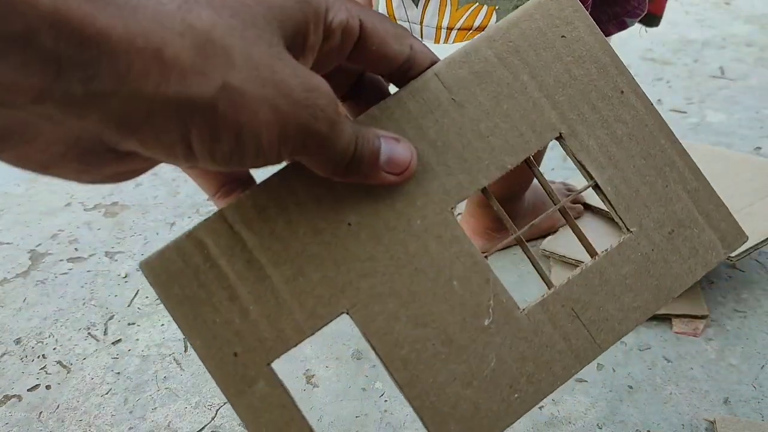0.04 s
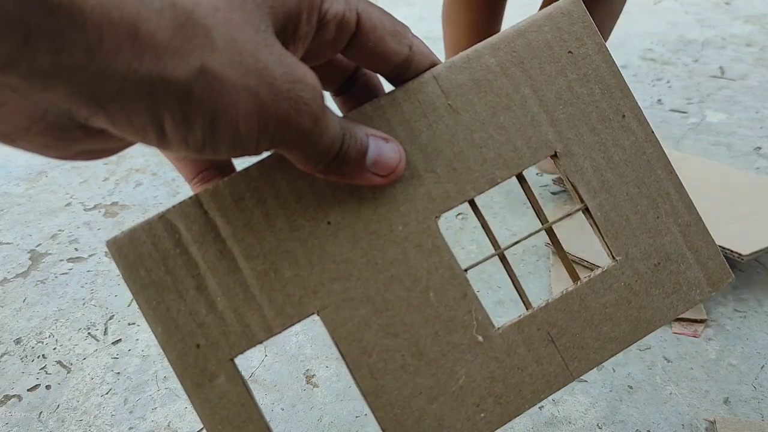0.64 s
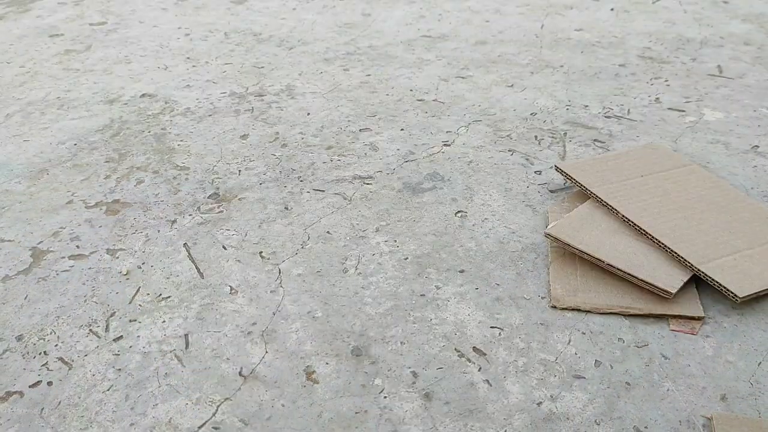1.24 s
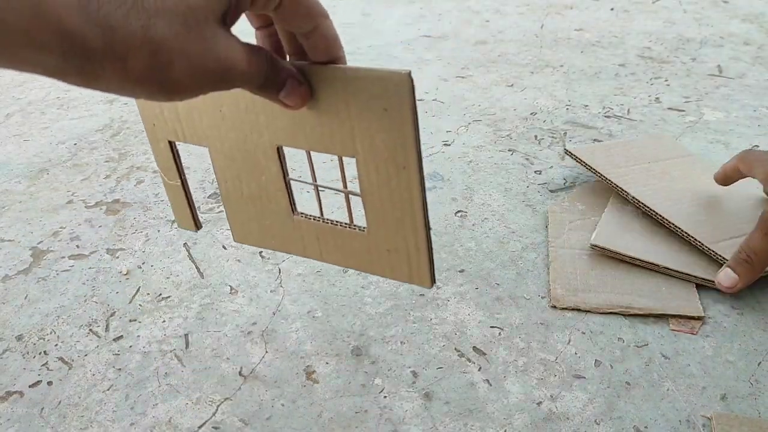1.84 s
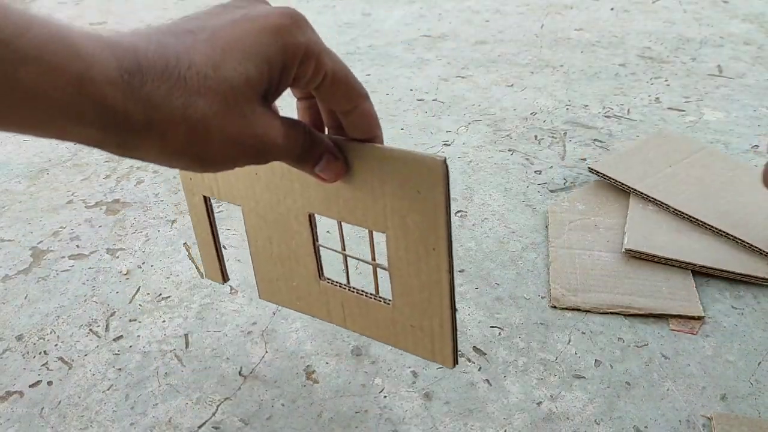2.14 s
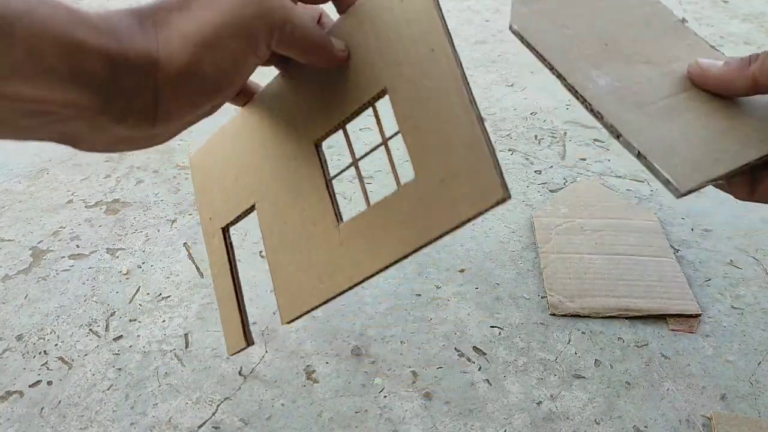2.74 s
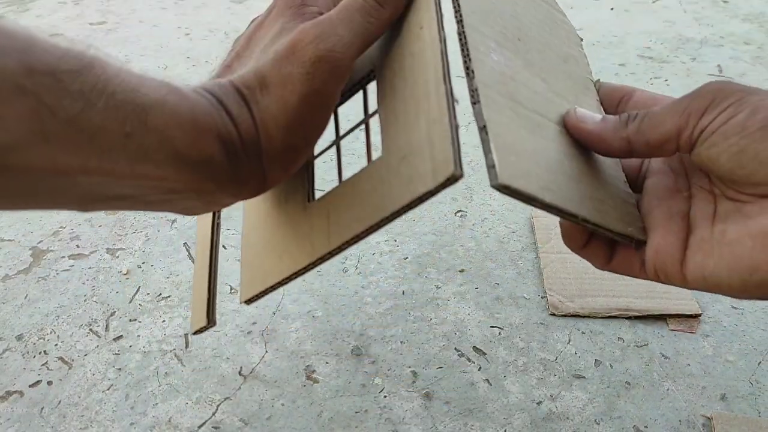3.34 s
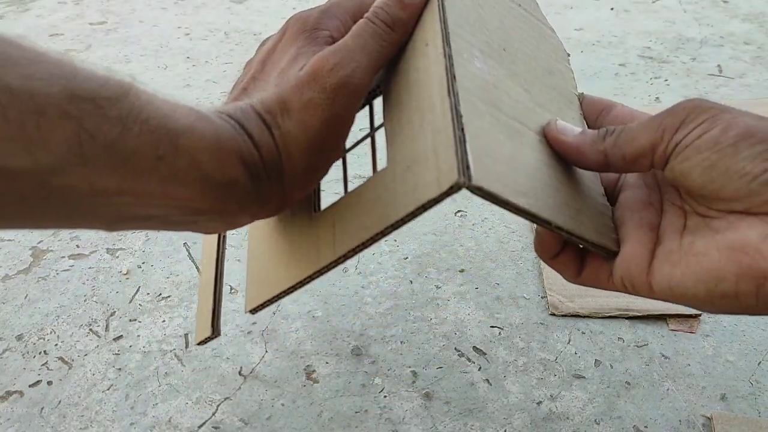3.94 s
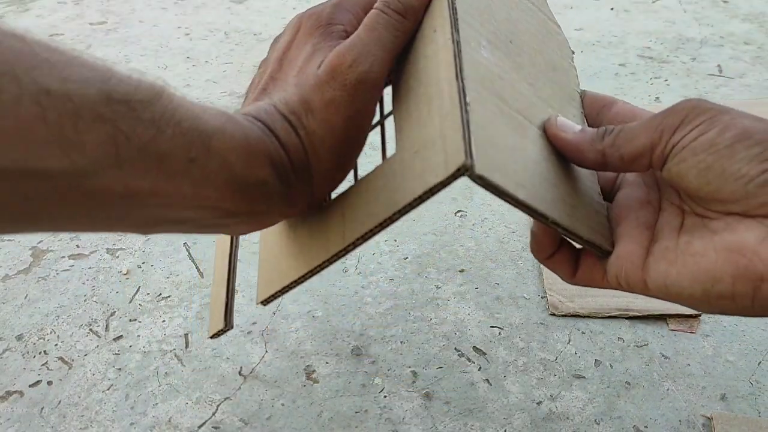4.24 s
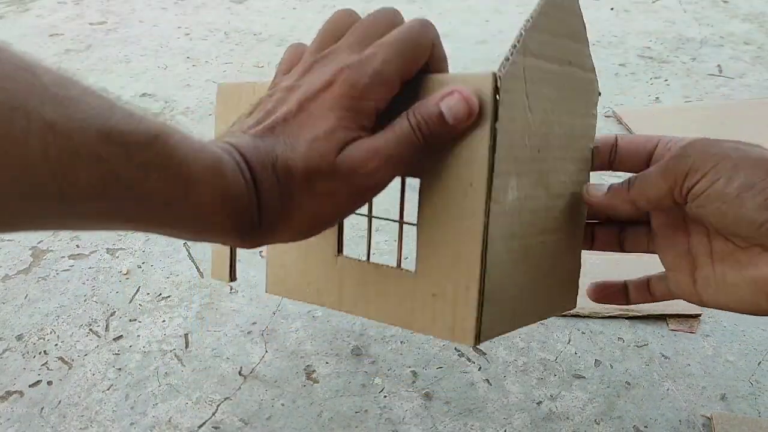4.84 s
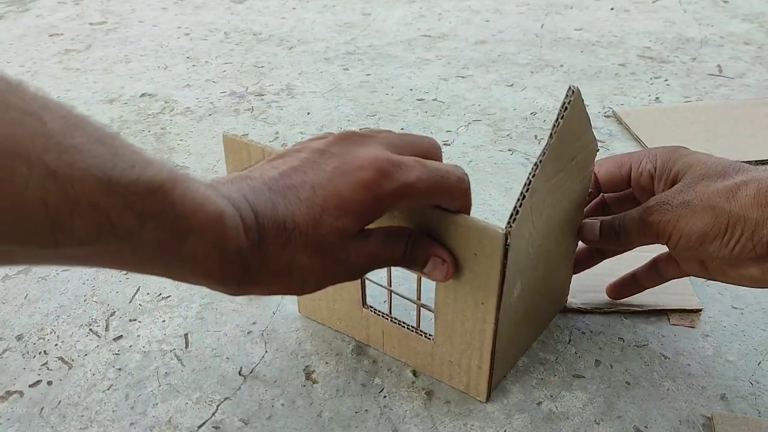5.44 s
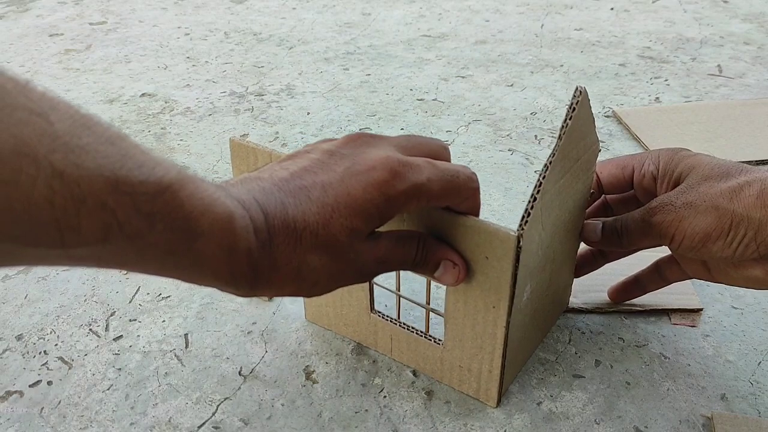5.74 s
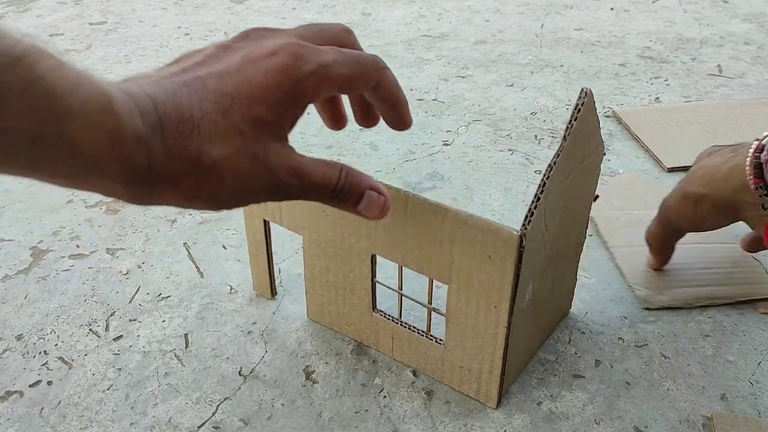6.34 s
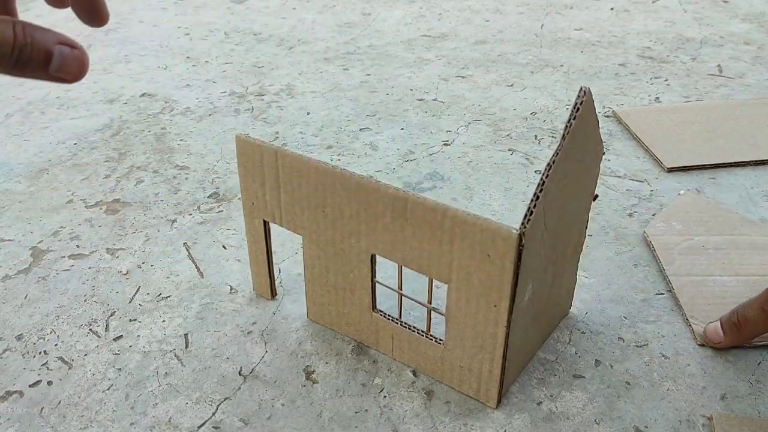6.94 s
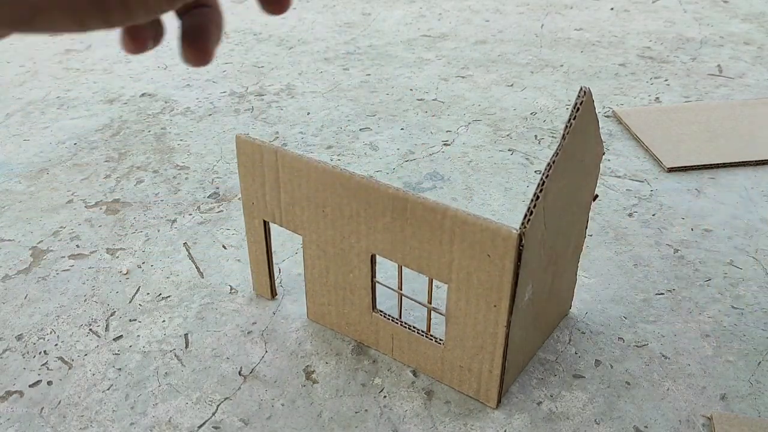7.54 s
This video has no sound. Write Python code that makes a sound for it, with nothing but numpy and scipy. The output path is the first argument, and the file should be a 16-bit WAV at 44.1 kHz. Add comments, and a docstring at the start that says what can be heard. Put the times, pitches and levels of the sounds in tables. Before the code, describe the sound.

Outdoors, an insect ticks fast and high with a soft rasp while distant birds peep and a dove coos faintly among trees. A piece of cardboard is dragged very softly, then lightly bumped. A small songbird close to the microphone, slightly to the right, sings swelling chirps, a rapid trill, four warbles and five falling whistles, then trills again as the insect fades.

```python
"""From the start an insect ticks about fifteen times a second; a dove and other birds call far off
among trees, blurred by scattering. A piece of cardboard is dragged briefly and very softly over the
floor, its ribs bumping over an edge. Then a small songbird close by, gliding the nearly pure tone of
its syrinx, sings swelling chirps (the cardboard gets a soft bump), a trill, warbles and falling
whistles, then trills again. The high ticking and rasp are faded out at the end."""
import sys
import numpy as np
from scipy import signal
from scipy.fft import rfft, irfft
from scipy.io import wavfile
from scipy.ndimage import uniform_filter1d

SR = 44100
rng = np.random.default_rng(int(sys.argv[2]) if len(sys.argv) > 2 else 0)


def output_pcm(signal):
    """Save a mono or channel-first signal as 16-bit PCM at the path in sys.argv[1].

    Samples are clipped to [-1, 1] before scaling.
    """
    pcm = np.clip(np.atleast_2d(signal).T, -1, 1) * 32767
    wavfile.write(sys.argv[1], SR, np.round(pcm).astype(np.int16))


N = 339129
TIME, FREQS = np.arange(N) / SR, np.fft.rfftfreq(N, 1 / SR)

# the one note of a far peep: delay_s, length_s, start_hz, middle_hz, end_hz, level_db
PEEP_NOTES = [(0, .042, 3550, 3850, 3750, -42)]
# far slurs, each a buzz and a fall: start_s, fall_gain_db, length_ratio, pitch_ratio, buzz_gain_db
SLUR_CALLS = [(2.01, -1, .62, 0.93, -8.5), (2.239, -3, 1.1, 0.86, -11), (4.568, -1, 0.89, 0.96, 6)]


def amp(db):
    """Decibels to amplitude ratio."""
    return 10 ** (np.asarray(db) / 20)


def unit(x):
    """Normalisation to rms 1."""
    return x / np.sqrt(np.mean(x ** 2) + 1e-20)


def follow(points, at):
    """Linear interpolation through (x, value) rows."""
    return np.interp(at, *np.transpose(points))


def add(mix, start_s, sound):
    """Superposition: a sound joins the mix at start_s."""
    part = mix[max(round(start_s * SR), 0):][:len(sound)]
    part += sound[:len(part)]


def noise(spectrum):
    """Spectral shaping: noise of rms 1 that rolls off beyond the spectrum's first and last points."""
    hz, db = np.transpose(spectrum)
    gain = amp(np.interp(np.log(FREQS + 1), np.log(hz + 1), db))
    gain *= np.minimum(FREQS / hz[0], 1) ** 4 / np.maximum(FREQS / hz[-1], 1) ** 8
    return unit(irfft(rfft(rng.standard_normal(N)) * gain, N))


def wander(count, size):
    """Low-pass noise: a drift of rms 1, smoothed twice over `size` samples."""
    return unit(uniform_filter1d(uniform_filter1d(rng.standard_normal(count), size), size))


def ramps(t, attack_s, release_s):
    """Trapezoidal envelope: rise, hold and fall."""
    return np.minimum(t / attack_s, 1) * np.minimum((t[-1] - t) / release_s, 1)


def place(x, lead_ms, right_db):
    """Time and level differences give direction: the left channel is earlier, the right louder."""
    left = irfft(rfft(x) * np.exp(2j * np.pi * FREQS * lead_ms / 1000), N)
    return np.array([left * amp(-right_db / 2), x * amp(right_db / 2)])


def trees(x, t60_s, near_db, tail_db):
    """Reverberation: early reflections, then thin scattering from foliage, different in each channel."""
    t = np.arange(SR) / SR
    scatter = rng.standard_normal((2, SR)) * (rng.random((2, SR)) < .05)
    tail = scatter * amp(-60 * t / t60_s) * (t > .012)
    reflections = rng.standard_normal((2, SR)) * (rng.random((2, SR)) < .02)
    near = reflections * np.exp(-t / .015) * (t > .002)
    response = sum(amp(db) * part / np.linalg.norm(part, axis=1, keepdims=True)
                   for part, db in [(near, near_db), (tail, tail_db)])
    return signal.fftconvolve(x[None], response, axes=1)[:, :N] * amp([[-2.5], [2.5]])


def tone(hz, gain, jitter=.0071):
    """Nearly sinusoidal oscillation, as of a syrinx: unsteady pitch and a faint second harmonic."""
    phase = 2 * np.pi * np.cumsum(hz * (1 + jitter * wander(len(hz), size=30))) / SR
    edges = signal.windows.tukey(len(hz), min(1, 60 / len(hz)))
    return gain * edges * (np.sin(phase) + amp(-34) * np.sin(2 * phase))


def glide(length_s, start_hz, middle_hz, end_hz, db):
    """Frequency sweep of one note: a parabola of pitch and an arch of gain."""
    u = np.linspace(0, 1, int(length_s * SR))
    hz = np.polyval(np.polyfit([0, .5, 1], [start_hz, middle_hz, end_hz], 2), u)
    return hz, amp(db) * abs(np.sin(np.pi * u)) ** .9


def flutter(hz, gain, rate_hz, depth_hz, pulsing_db, first_peak_s):
    """Frequency and amplitude modulation: the pitch flicks up, then slides down at its loudest."""
    turn = 2 * np.pi * rate_hz * (np.arange(len(hz)) / SR - first_peak_s) + np.pi / 3
    vibrato = np.sin(turn) + np.sin(2 * turn) / np.pi
    return hz + depth_hz * vibrato, gain * amp(-pulsing_db * (.5 + np.cos(turn)))


def run_of(start_s, repeats, first_db, last_db, period_s):
    """Periodic repetition whose level moves fast at first, then settles: rows of start_s, gain_db."""
    k = np.arange(repeats)
    gain_db = last_db + (first_db - last_db) * (1 - k / k[-1]) ** 2.2
    return np.column_stack([start_s + k * period_s, gain_db])


def syllable(notes, jitter, gain_db, stretch=1, pitch=1):
    """Superposed glides, each with a small random change of pitch and level."""
    out = np.zeros(SR // 2)
    for delay_s, length_s, *shape in notes:
        hz, gain = glide(length_s * stretch, *shape)
        detune, effort_db = rng.normal(0, [.009, 1.0])
        note = tone(hz * pitch * (1 + detune), gain * amp(gain_db + effort_db), jitter)
        add(out, delay_s * stretch, note)
    return out


def sing(notes, calls, jitter):
    """Repetition with variation: one syllable at each listed time."""
    out = np.zeros(N)
    for start_s, *manner in calls:
        add(out, start_s, syllable(notes, jitter, *manner))
    return out


def air(drift_db=1.6):
    """Partly coherent noise: a faint outdoor wash, half shared by the channels, that swells and sinks."""
    spectrum = [(25, -18), (90, -33.5), (150, -14), (230, -8), (350, -3), (700, -1), (1300, -3.5),
                (2000, -8), (2800, -12.5)]  # colour of the wash: frequency_hz, density_db
    levels = [(0, -82), (2, -78.5), (3, -79.5), (4, -78), (5.5, -79), (7.69, -80.5)]  # its slow course: time_s, level_db
    incoherent = np.array([noise(spectrum), noise(spectrum)])
    level_db = follow(levels, TIME) + drift_db * wander(N, size=3500)
    return unit(noise(spectrum) + 1.03 * incoherent) * amp(level_db) * amp([[-1.8], [1.8]])


def chorus(count=190, twitter_db=-8, wash_db=-4):
    """Diffuse field of many far birds: echoes of random peeps in a wash of noise."""
    spectrum = [(1500, -22), (2100, -14), (2700, -4), (3600, 1), (4600, -4), (6000, -23.5)]  # colour of the blurred song: frequency_hz, density_db
    levels = [(0.0, -78), (0.56, -72.5), (1.14, -65.5), (1.56, -61.5), (2.01, -59), (2.23, -54),
              (2.83, -60), (3.9, -50.5), (4.58, -54.5), (5.14, -63.5), (7.24, -53), (7.35, -52),
              (7.69, -49)]  # swell of the chorus: time_s, gain_db
    # random peeps: start_s, gain_db, length_ratio, pitch_ratio
    calls = rng.random((count, 4)) * [TIME[-1], 8, .5, .4] + [0, 0, .4, .72]
    twitter = unit(trees(sing(PEEP_NOTES, calls, jitter=.025), t60_s=.3, near_db=0, tail_db=0))
    wash = np.array([noise(spectrum), noise(spectrum)]) * amp([[-2], [2]])
    return (amp(twitter_db) * twitter + amp(wash_db) * wash) * amp(follow(levels, TIME))


def dove(sink=.04):
    """Random frequency modulation makes soft, slightly sinking coos husky."""
    coos = [(.26, .22, 470, -84), (.82, .33, 480, -84), (1.52, .2, 465, -82), (3.38, .16, 470, -79),
            (3.97, .27, 475, -80), (4.43, .32, 455, -80)]  # the dove's notes: start_s, length_s, pitch_hz, level_db
    out = np.zeros(N)
    for start_s, length_s, hz, db in coos:
        u = np.linspace(0, 1, int(length_s * SR))
        husk = .075 * wander(len(u), size=120)
        arch = np.sqrt(abs(np.sin(np.pi * u)))
        add(out, start_s, tone(hz * (1 + sink * (.5 - u) + husk), amp(db) * arch))
    return place(out, lead_ms=.01, right_db=3.5) + trees(out, t60_s=.4, near_db=-8, tail_db=-4)


def cardboard_drag(start_s=2.33, length_s=.2, ribs_hz=151, db=-70):
    """Impulse train: corrugations bump over an edge as a sheet is dragged, giving a short, dull burr."""
    stroke = np.zeros(N)
    add(stroke, start_s, np.hanning(int(length_s * SR)))
    ribs = np.diff(np.floor(ribs_hz * TIME), prepend=0)
    band = signal.butter(2, [280, 1200], "band", fs=SR, output="sos")
    burr = signal.sosfilt(band, unit(ribs) + .5 * rng.standard_normal(N))
    return amp(db) * unit(burr) * stroke * amp([[-2], [2]])


def cardboard_bump(start_s=3.335, hz=800, decay_s=.021, db=-72):
    """Damped oscillation of rough pitch: a soft bump against the cardboard."""
    t, out = np.arange(SR // 8) / SR, np.zeros(N)
    add(out, start_s, tone(np.full(len(t), hz), amp(db) * np.exp(-t / decay_s), jitter=.11))
    return out * amp([[-2], [2]])


def buzzes():
    """Fast modulation roughens the arch of pitch that opens each far slur."""
    out = np.zeros(N)
    for start_s, _, stretch, pitch, buzz_db in SLUR_CALLS:
        arch = glide(.1 * stretch, start_hz=3150, middle_hz=4200, end_hz=3400, db=-41)
        hz, gain = flutter(*arch, rate_hz=67, depth_hz=280, pulsing_db=5, first_peak_s=.0005)
        add(out, start_s, tone(hz * pitch, gain * amp(buzz_db), jitter=.02))
    return out


def far_birds(clear_db=-3, hoarse_db=-13):
    """Direct-to-reverberant ratio: peeps and buzzes carry clearly, hoarse falls are mostly echo."""
    # falling syllables: delay_s, length_s, start_hz, middle_hz, end_hz, level_db
    pair_notes = [(0, 0.067, 5400, 4030, 3790, -48), (.075, .07, 4800, 3150, 2846, -51.5)]
    fall_notes = [(.075, .165, 3600, 2870, 1820, -49)]
    # two-note calls and peeps: start_s, gain_db, length_ratio, pitch_ratio
    pair_calls = [(.57, -16.5, 2.06, 1), (0.889, -7, 0.88, 0.98), (1.079, -2.5, 0.86, 0.96),
                  (1.259, -2.5, .88, 0.94), (1.442, -1, 0.87, 0.91), (1.614, 1, 0.86, 0.95)]
    peep_calls = [(2.758, -7, 1.04, 1.04), (2.874, -12, 1.06, 1.06), (3.0, -6, 1.13, 1.08),
                  (3.12, -4, 0.69, 1.1), (3.36, 0.5, 1.07, 1.03), (3.686, 4, 0.76, 0.84),
                  (3.824, 1.5, 1.03, .88), (3.936, -5, 1.02, 1.25), (4.332, 0, 0.79, 1.12)]
    clear = sing(PEEP_NOTES, peep_calls, jitter=.022) + buzzes()
    hoarse = sing(pair_notes, pair_calls, jitter=.025)
    hoarse += sing(fall_notes, [call[:4] for call in SLUR_CALLS], jitter=.05)
    direct = amp(clear_db) * clear + amp(hoarse_db) * hoarse
    echoes = trees(clear, t60_s=.74, near_db=-11, tail_db=-7)
    echoes += trees(hoarse, t60_s=1, near_db=-3.5, tail_db=-3)
    return place(direct, lead_ms=.03, right_db=8) + echoes


def insect(tick_db=-39.5, rasp_db=-52.5, scatter_db=2.5, vary_db=1.17):
    """Amplitude-modulated noise: each stroke swells as a soft rasp and snaps in a short, bright tick."""
    pace = [(0, 15.693), (1.1, 15.387), (2.1, 15.435), (3.1, 15.307), (5.6, 15.231), (6.9, 15.346),
            (7.25, 14.9)]  # strokes per second: time_s, rate_hz
    levels = [(0, -1.5), (7.3, 0), (7.37, -11.5), (7.69, -24)]  # steady level, then a closing fade-out: time_s, gain_db
    # colours of tick and rasp: frequency_hz, density_db
    tick_spectrum = [(5800, -13), (6700, -2.5), (7800, -0.5), (8900, -9), (9700, -29), (13000, -43),
                     (15500, -13)]
    rasp_spectrum = [(3400, -27.5), (4700, -3.5), (5600, -6), (6700, -1.5), (7700, 1.5), (9800, -7),
                     (11000, -5), (12300, -8.5), (13400, -3), (14200, -8), (15300, -4)]
    first_tick_s, rise_s, hold_s, decay_s = .019, .00063, .002, .0018
    rasp_rise_s, rasp_decay_s, rasp_drop_db, rasp_floor_db = .011, .017, -7.5, -12.5
    rate_hz = follow(pace, TIME)
    strokes = np.cumsum(rate_hz) / SR
    strokes -= np.interp(first_tick_s, TIME, strokes)
    nearest = np.round(strokes).astype(int)
    from_tick_s = (strokes - nearest) / rate_hz
    before_s = np.maximum(-from_tick_s - hold_s / 2, 0)
    after_s = np.maximum(from_tick_s - hold_s / 2, 0)
    force = amp(vary_db * rng.standard_normal(nearest[-1] + 1))[nearest]
    snap = np.exp(-after_s / decay_s)
    tick = noise(tick_spectrum) * amp(tick_db) * np.exp(-before_s / rise_s) * snap * force
    # the rasp drops back after each tick but never quite stops
    linger = amp(rasp_drop_db) * np.exp(-after_s / rasp_decay_s)
    rub = np.exp(-before_s / rasp_rise_s) * np.maximum(snap, linger)
    grain_db = 1.5 * wander(N, size=40)
    swell = (rub + amp(rasp_floor_db)) * amp(rasp_db + grain_db) * force
    rasp = place(noise(rasp_spectrum) * swell, lead_ms=.097, right_db=4.5)
    scatter = amp(scatter_db) * swell * np.array([noise(rasp_spectrum), noise(rasp_spectrum)])
    return (place(tick, lead_ms=.098, right_db=6) + rasp + scatter) * amp(follow(levels, TIME))


def warbles(held_hz=5903, scoop_hz=1780, scoop_s=.00355, held_db=-25.5, fade_db=-6, hurry=.017):
    """Vibrato on a high, fading note, between a short scoop and a quick slide down."""
    # the scoop and the slide: delay_s, length_s, start_hz, middle_hz, end_hz, level_db
    frame_notes = [(0, 0.019, 4130, 5840, 5300, -36), (.099, .044, 4087, 3120, 2210, -39.5)]
    calls = run_of(4.503, repeats=4, first_db=-.7, last_db=-.3, period_s=.196)
    out = np.zeros(N)
    for k, (start_s, db) in enumerate(calls):
        stretch = 1 + hurry * (len(calls) - 1 - k)  # each warble is shorter than the last
        t = np.arange(0, .083 * stretch, 1 / SR)
        hz = held_hz - scoop_hz * np.exp(-t / scoop_s)
        gain = amp(held_db + db + fade_db * (t / t[-1]) ** 2) * ramps(t, attack_s=.0066, release_s=.009)
        held = flutter(hz, gain, rate_hz=51.5 / stretch, depth_hz=180, pulsing_db=2.6, first_peak_s=.007)
        add(out, start_s, syllable(frame_notes, jitter=.016, gain_db=db, stretch=stretch))
        add(out, start_s + .015 * stretch, tone(*held, jitter=.007))
    return out


def whistles(top_hz=5967, end_hz=2296, handover_hz=3307, step_hz=150):
    """Two-sided syrinx: partway down each long, flattening fall, the weaker low side takes over."""
    falls = [(5.305, 0.25, 0.99, -0.4), (5.608, 0.26, 1.23, 0), (5.929, .2907, 1.19, -1),
             (6.298, 0.32, 1.67, -1.5), (6.698, 0.37, 1.82, -1)]  # downward sweeps: start_s, length_s, sag, gain_db
    top_db, fade_db, low_side_db = -29, -11, -8
    out = np.zeros(N)
    for start_s, length_s, sag, db in falls:
        u = np.linspace(0, 1, int(length_s * SR))
        height = (np.exp(-sag * u) - np.exp(-sag)) / (1 - np.exp(-sag))
        height *= 1 - .83 * np.exp(-height * 10)  # the end levels off
        hz = end_hz + (top_hz - end_hz) * height
        # at the handover the level dips and the pitch steps up
        below_hz = handover_hz - hz
        dip = 1 - .8 * np.exp(-(below_hz / 25) ** 2)
        jump_hz = step_hz * (below_hz > 0) * np.exp(-abs(below_hz) / 150)
        waver = 1 + .005 * wander(len(u), size=350)
        low_side = .5 + .5 * np.tanh(below_hz / 60)
        gain = amp(top_db + db + fade_db * (1 - height) + low_side_db * low_side)
        edges = ramps(u * length_s, attack_s=.046, release_s=.052) ** 1.06
        add(out, start_s, tone(hz * waver + jump_hz, dip * gain * edges))
    return out


def songbird(trill_db=.3):
    """Direct sound dominates: the near bird, a little to the right, with weak reflections."""
    # overlapping glides of a syllable: delay_s, length_s, start_hz, middle_hz, end_hz, level_db
    chirp_notes = [(.002, .021, 6900, 5800, 4600, -43), (.017, .021, 4400, 5300, 5850, -42),
                   (.029, .029, 3650, 4900, 5750, -40), (.047, .045, 4100, 5230, 4850, -38),
                   (.012, .044, 3500, 3150, 2500, -47)]
    trill_notes = [(.0015, .0075, 3750, 5950, 6750, -32.5), (.0075, .009, 3950, 5950, 6500, -30),
                   (.0195, .0125, 5300, 5180, 5650, -30), (.0285, .0095, 5650, 5000, 3250, -32),
                   (.037, .011, 3150, 4050, 2650, -36), (.053, .021, 2250, 3150, 2450, -46.5)]
    trill_runs = [(3.6427, 8, -2.5, 1.8), (7.140, 6, 0, -2)]  # the two trills: start_s, repeats, first_db, last_db
    chirp_calls = run_of(2.994, repeats=5, first_db=-17.5, last_db=.5, period_s=.131)
    chirps = sing(chirp_notes, chirp_calls, jitter=.026)
    trills = sum(sing(trill_notes, run_of(*run, period_s=.10687), jitter=.013) for run in trill_runs)
    song = chirps + amp(trill_db) * trills + warbles() + whistles()
    echoes = trees(song, t60_s=.55, near_db=-12.5, tail_db=-16.5)
    return place(song, lead_ms=.033, right_db=8) + echoes


def scene():
    """Superposition of all the sources in stereo."""
    birds = songbird() + far_birds() + chorus() + dove()
    return birds + insect() + cardboard_drag() + cardboard_bump() + air()


def record(dry):
    """Band limiting: a steep, linear-phase low-pass removes the highest treble."""
    edge_hz = 15800
    low_pass = signal.firwin(511, edge_hz, window=("kaiser", 9), fs=SR)
    return signal.oaconvolve(dry, low_pass[None], "same", axes=1)


dry = scene()
out = record(dry)
output_pcm(out)
```